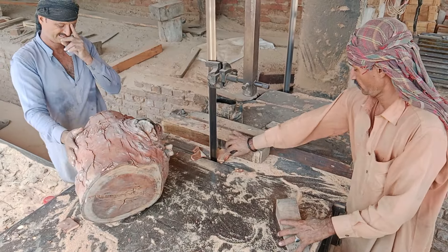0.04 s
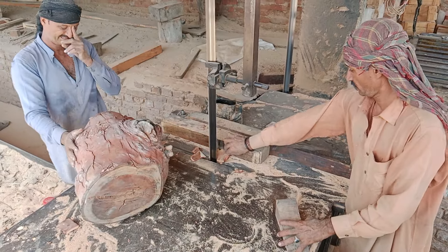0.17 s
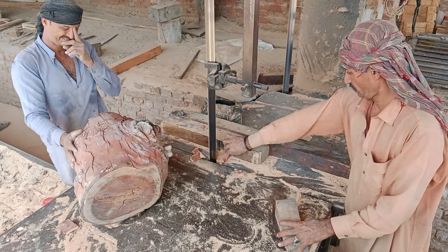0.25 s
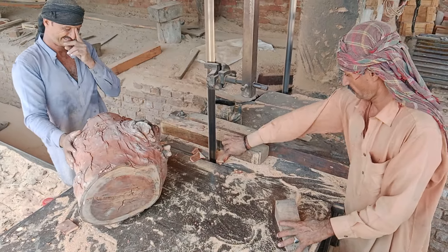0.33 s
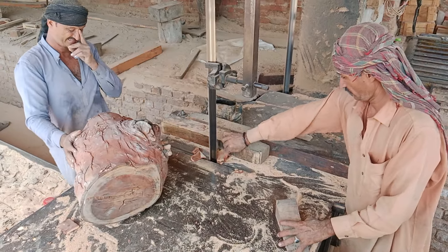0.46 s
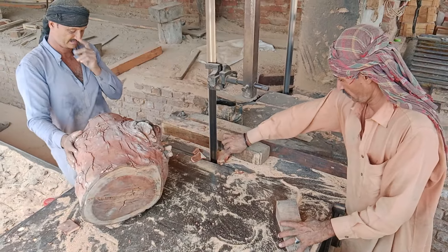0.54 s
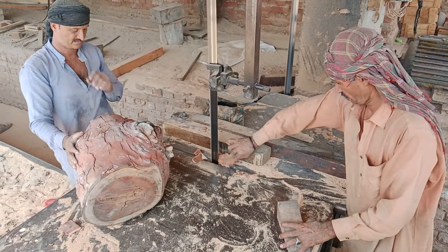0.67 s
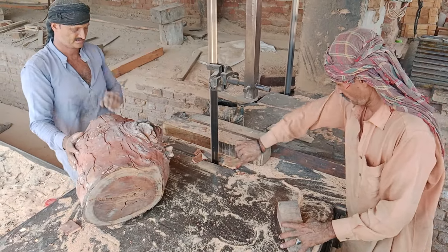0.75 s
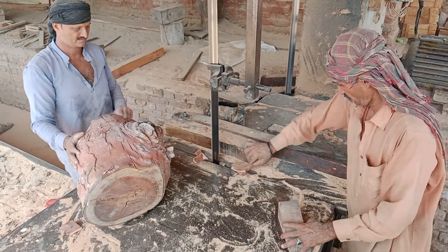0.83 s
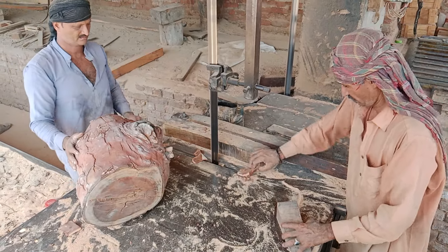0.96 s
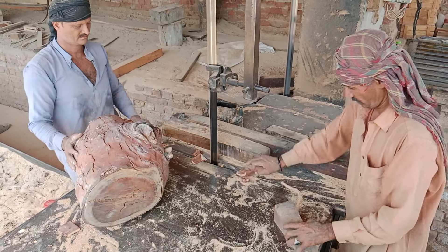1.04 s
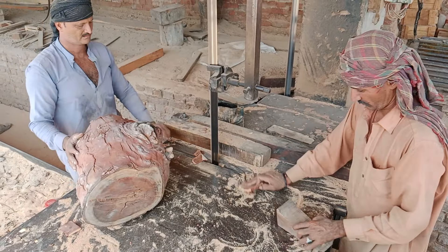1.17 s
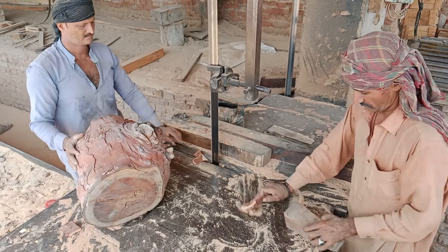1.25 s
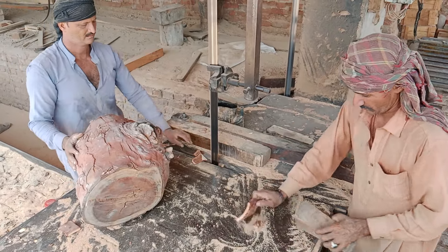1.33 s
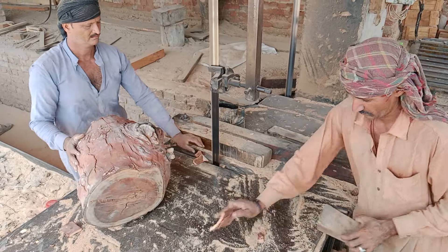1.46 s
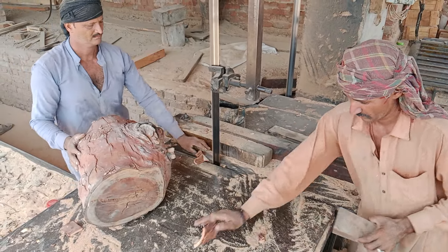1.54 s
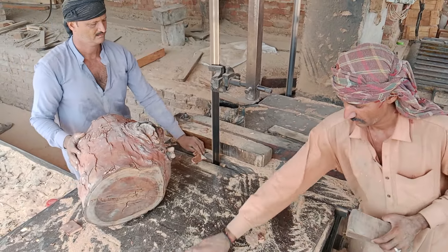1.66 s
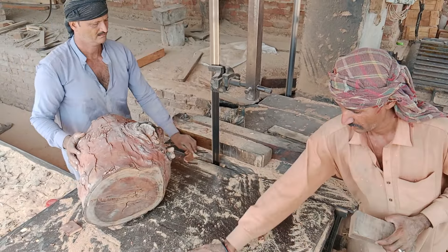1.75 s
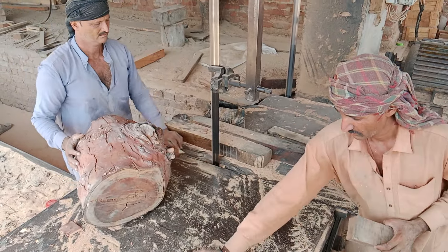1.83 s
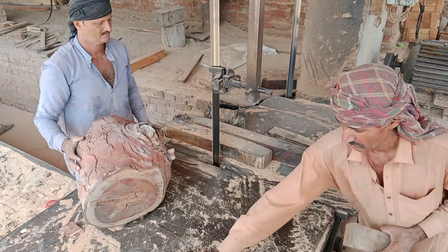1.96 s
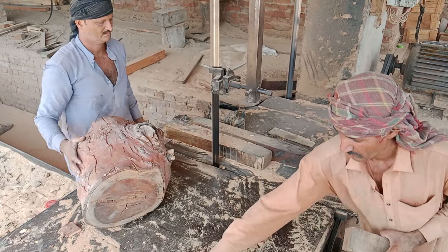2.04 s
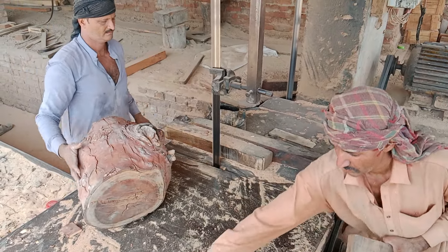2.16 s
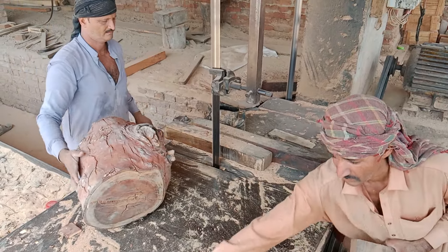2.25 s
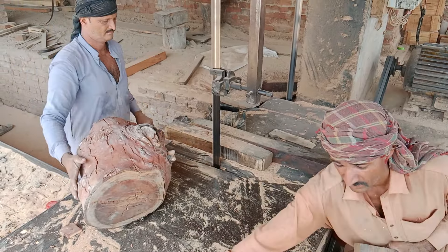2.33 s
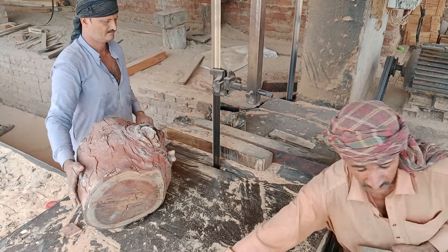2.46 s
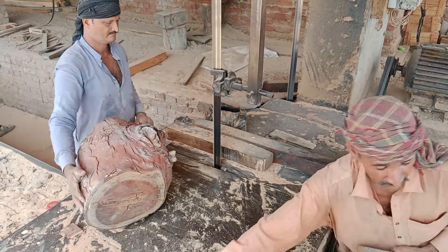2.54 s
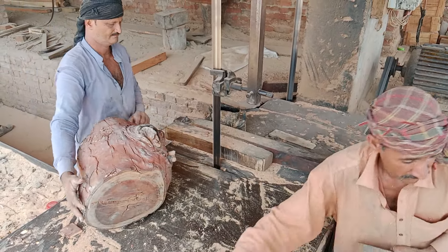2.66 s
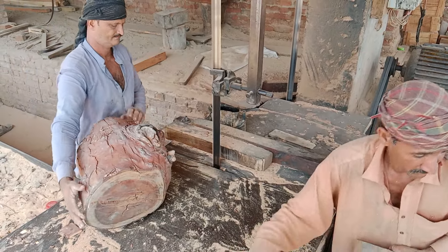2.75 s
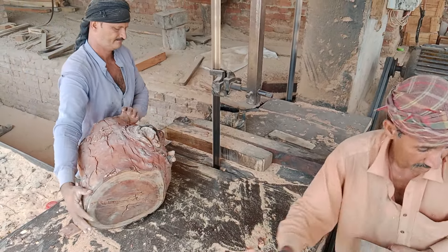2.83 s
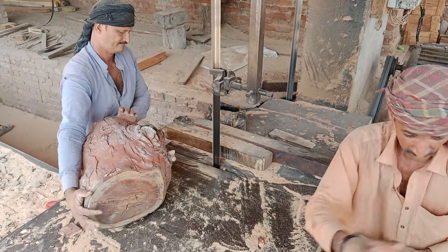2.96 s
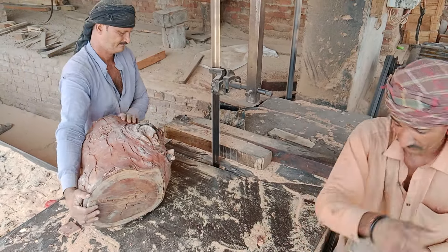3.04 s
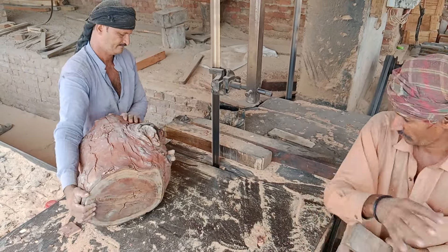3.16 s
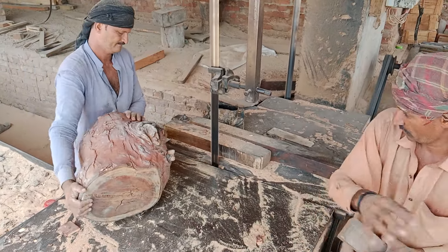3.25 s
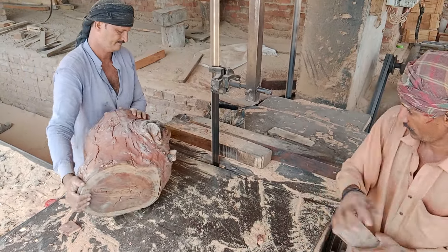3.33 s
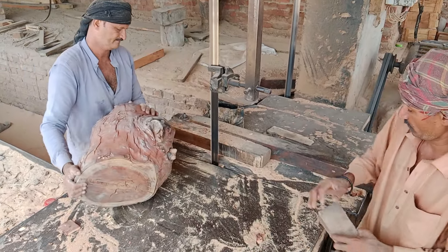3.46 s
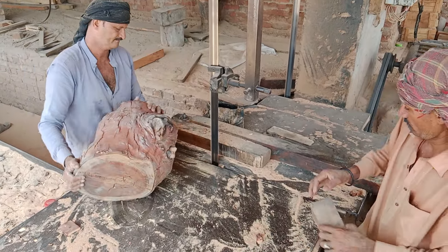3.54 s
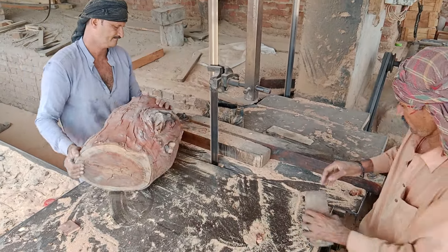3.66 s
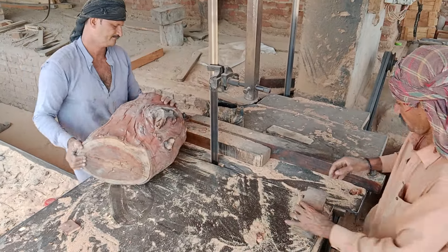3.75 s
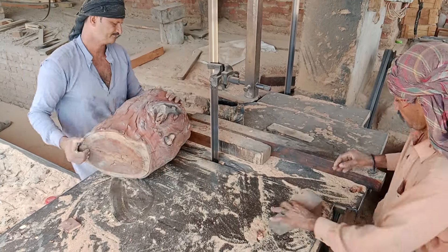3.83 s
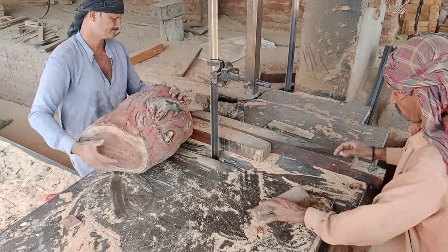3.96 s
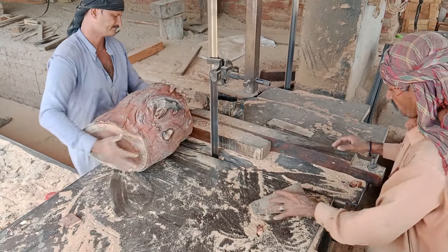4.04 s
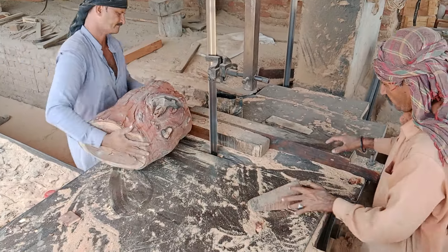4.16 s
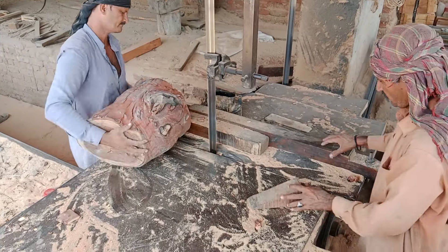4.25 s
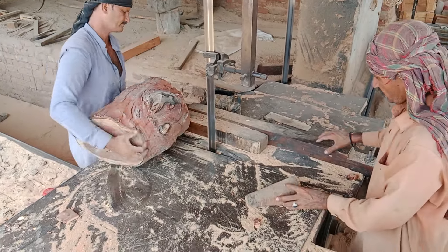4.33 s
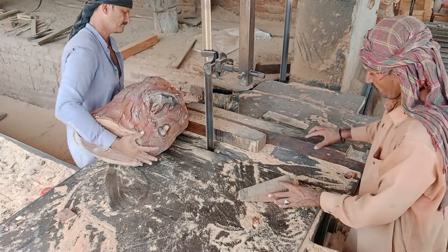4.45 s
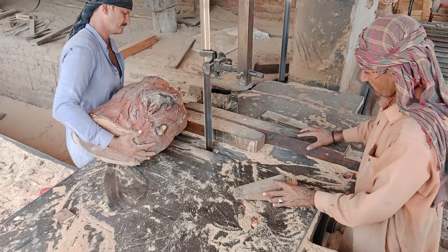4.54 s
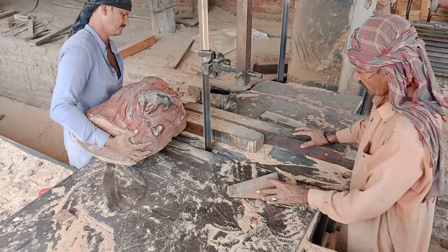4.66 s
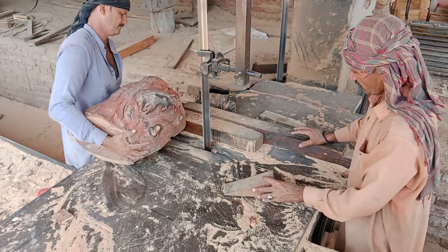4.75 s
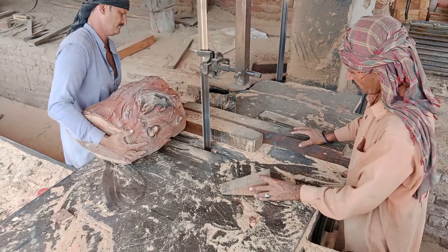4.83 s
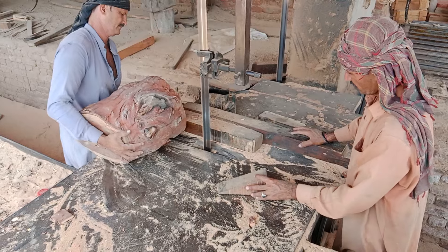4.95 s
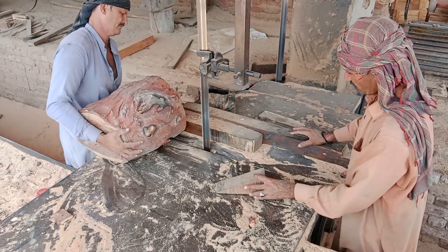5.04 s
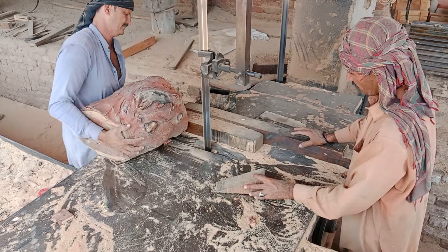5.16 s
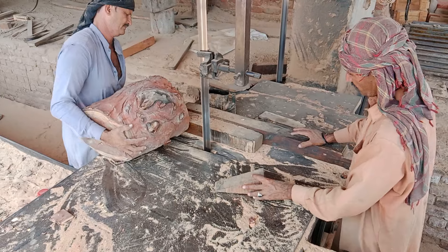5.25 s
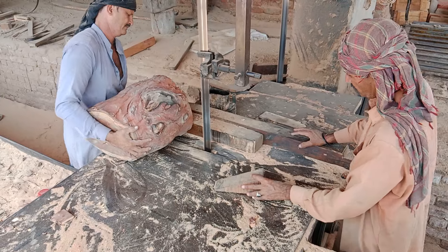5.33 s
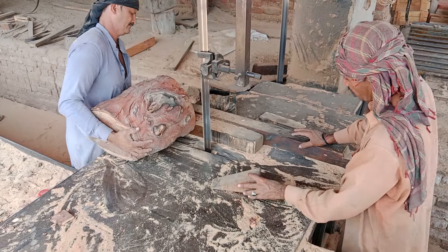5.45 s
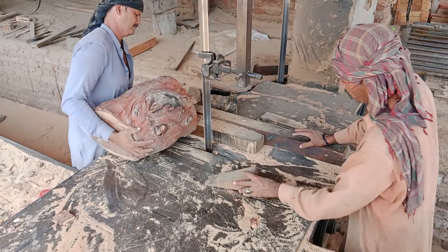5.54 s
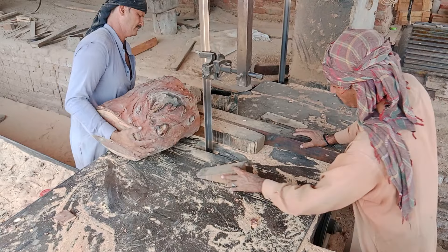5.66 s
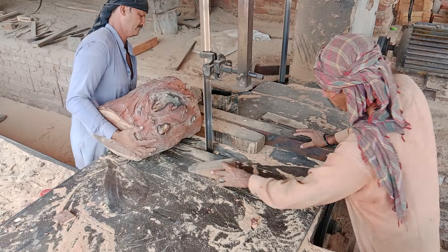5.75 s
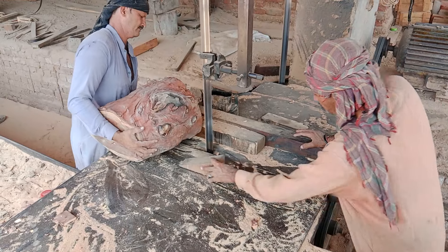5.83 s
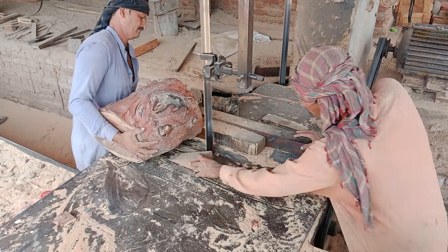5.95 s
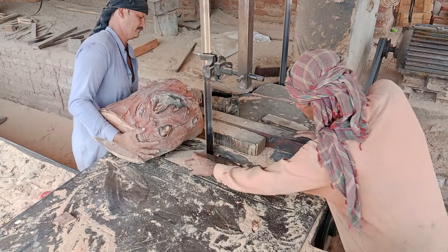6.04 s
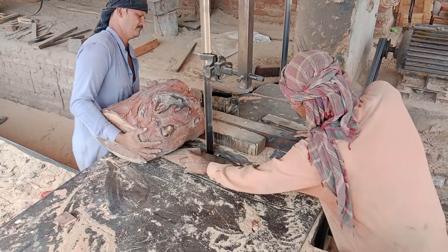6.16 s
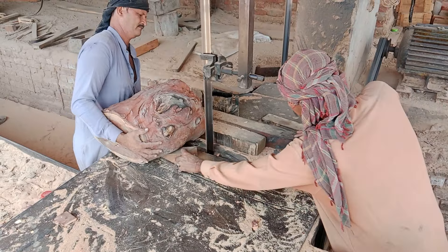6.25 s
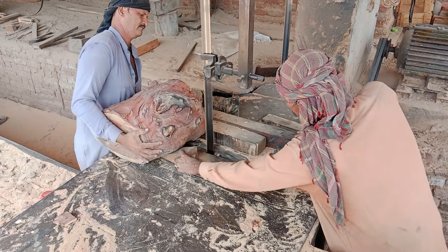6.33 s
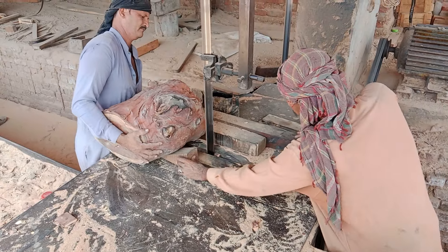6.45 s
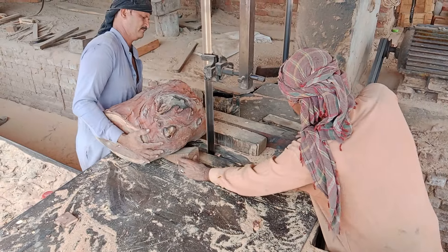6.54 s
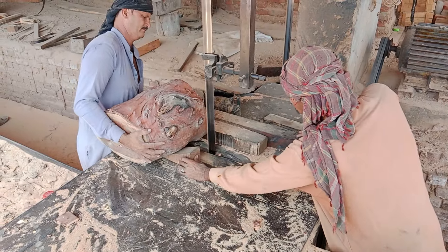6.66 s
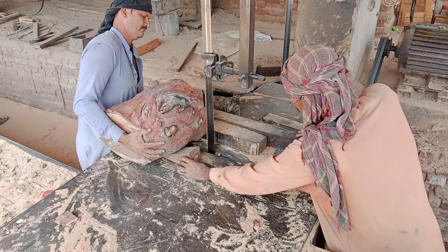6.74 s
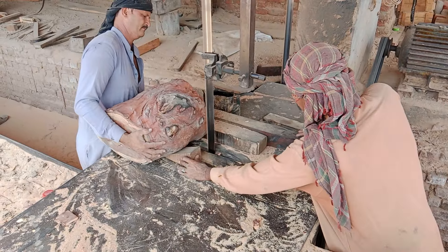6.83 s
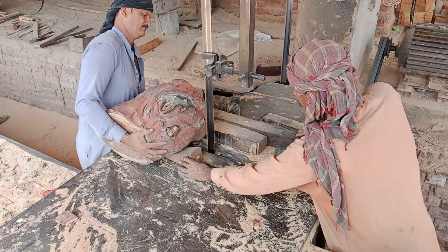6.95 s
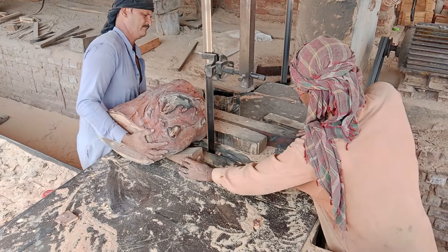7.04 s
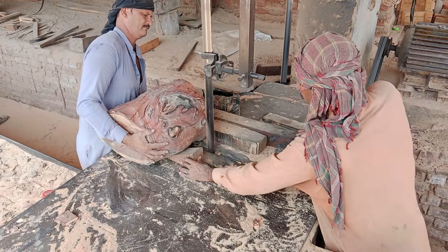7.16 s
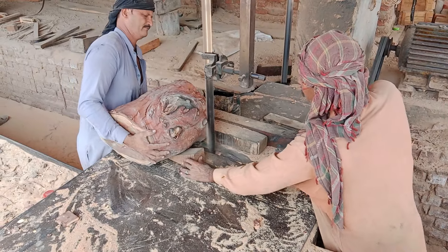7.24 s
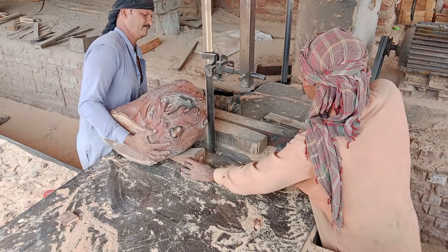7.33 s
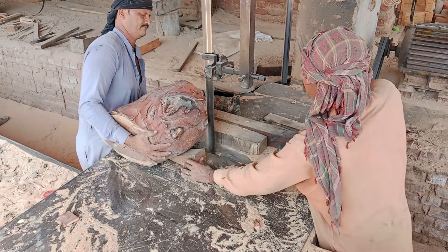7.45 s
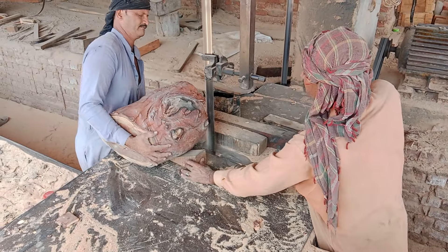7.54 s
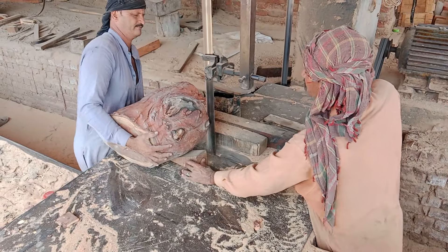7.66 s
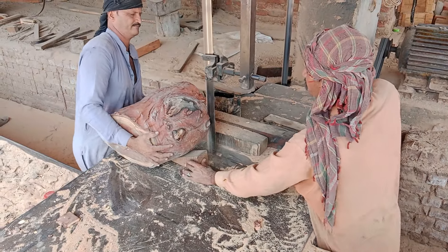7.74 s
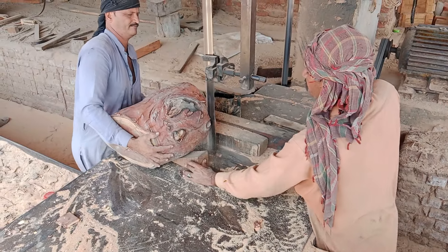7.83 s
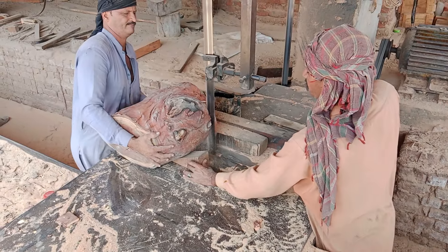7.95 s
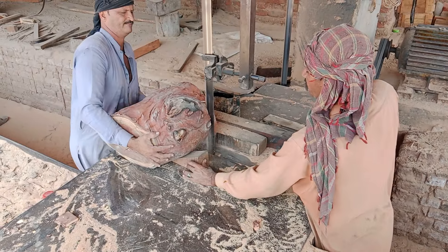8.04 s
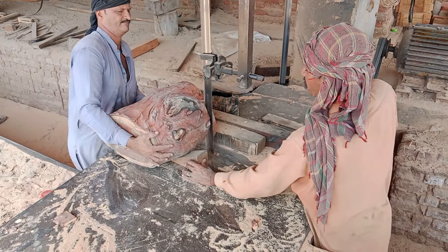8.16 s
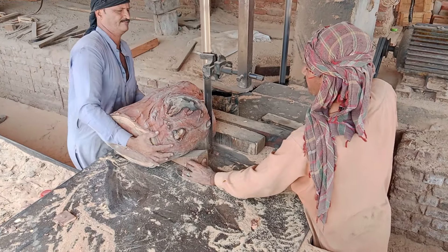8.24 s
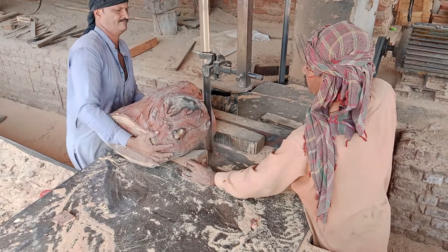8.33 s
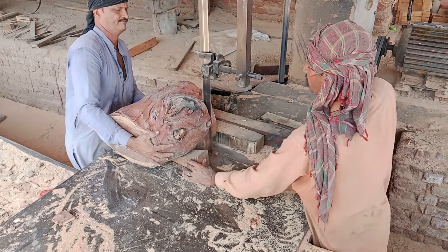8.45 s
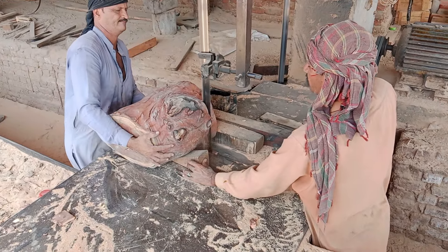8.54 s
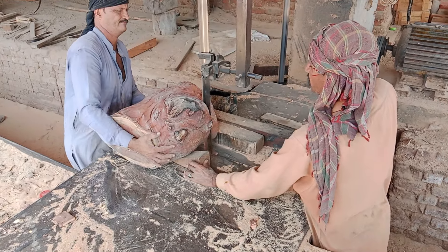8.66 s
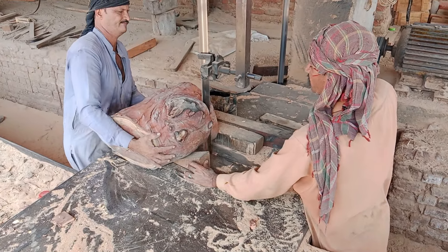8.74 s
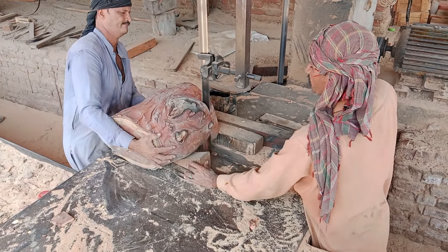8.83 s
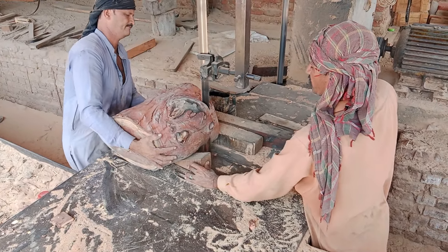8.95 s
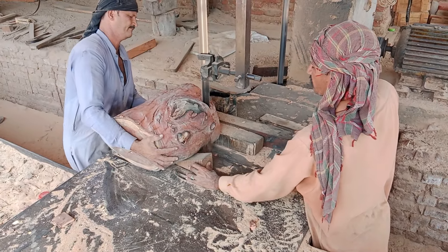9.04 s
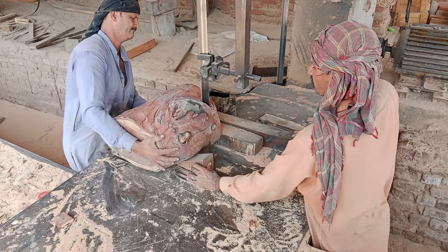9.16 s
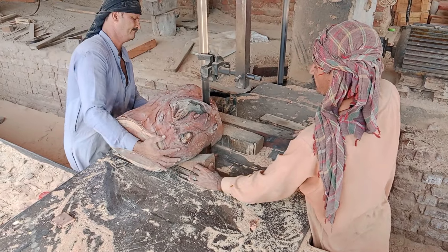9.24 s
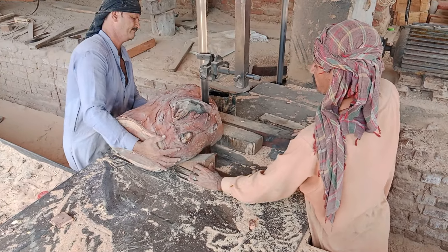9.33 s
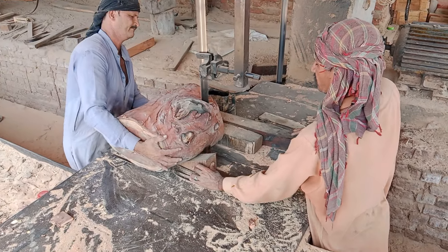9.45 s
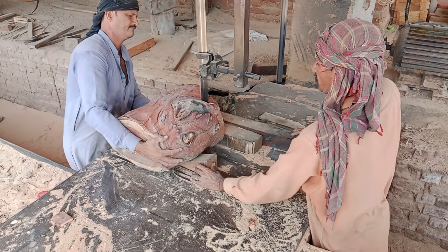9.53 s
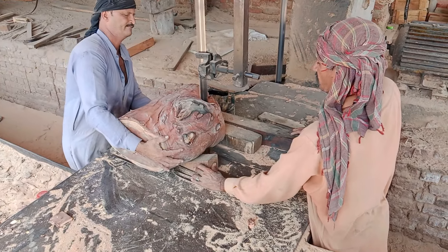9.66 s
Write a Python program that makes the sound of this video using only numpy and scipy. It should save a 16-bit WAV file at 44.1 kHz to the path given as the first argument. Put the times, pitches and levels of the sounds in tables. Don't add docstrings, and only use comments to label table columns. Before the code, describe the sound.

A band saw runs free with a steady hissing metallic whine, a log knocks on its table, then the cut bursts into a loud pulsing roar.

```python
import sys
import numpy as np
from scipy import signal
from scipy.fft import rfft, irfft
from scipy.io import wavfile

SR = 44100
rng = np.random.default_rng(int(sys.argv[2]) if len(sys.argv) > 2 else 0)


def gain_from_db(level_db):
    decades = np.asarray(level_db, float) / 20
    return 10 ** decades


def unload_wav(signal):
    wavfile.write(
        sys.argv[1],
        SR,
        np.round(np.clip(np.atleast_2d(signal).T, -1, 1) * 32767).astype(np.int16),
    )


N = 427329

# cut_on_hz, edge_hz, fade_hz, level_db
BENDING_WAVES = [(503, 15, 960, -21.5), (598, 52, 970, -16.5), (1460, 51, 1200, -60), (1780, 17, 350, -17),
                 (2536, 23, 66, -1.5), (2620, 69, 930, -11), (4660, 13, 90, -6), (4970, 100, 570, -7.5),
                 (6140, 25, 330, -13.5), (6760, 12, 110, 2.5), (6834, 73, 796, -2.5),
                 (12460, 120, 2100, -12), (13330, 200, 1500, -9)]
# centre_hz, width_hz, level_db
SPAN_MODES = [(895, 28, 8), (960, 50, -4), (1062, 28, 6), (1115, 30, -3), (1155, 35, 4), (1205, 70, -7),
              (1275, 110, -9), (1765, 30, 7), (1830, 40, -3), (1945, 35, 3), (2550, 30, 2), (2790, 70, 3),
              (2845, 25, -4), (2995, 35, 3), (3050, 500, 2.5), (3210, 40, 3), (3430, 160, -3),
              (3515, 40, 3), (3660, 30, -3), (3775, 60, 4), (3825, 30, -4), (3945, 60, 4), (4140, 50, 3),
              (4295, 50, 3), (5200, 70, 3), (5570, 50, 2), (6020, 60, -3), (8100, 200, 2), (8620, 80, 3),
              (9230, 120, 2)]
# pitch_hz, level_db (per Hz)
GUIDE_HISS = [(300, -39), (1200, -40), (1700, -22), (2400, -22.5), (3800, -19.5), (4500, -16),
              (6000, -10.5), (6600, -2.5), (8500, -10.5), (9400, -73), (10400, -18.5), (10900, -21),
              (11800, -19.5), (15700, -25)]


def band_colour():
    hz = bins_hz()
    power = gain_at(GUIDE_HISS) ** 2
    for on_hz, edge_hz, fade_hz, level_db in BENDING_WAVES:
        edge = 0.5 + 0.5 * np.tanh((hz - on_hz) / edge_hz)
        fade = np.exp(-np.maximum(hz - on_hz, 0) / fade_hz)
        power = power + gain_from_db(level_db) ** 2 * edge * fade
    return np.sqrt(power) * ripple(SPAN_MODES)


def band_song(song_db, top_db):
    colour, hz = band_colour(), bins_hz()
    low = 0.5 - 0.5 * np.tanh((hz - 1400) / 300)
    top = 0.5 + 0.5 * np.tanh((hz - 11500) / 500)
    middle = np.abs(1 - low - top)
    hum_share = np.sqrt(np.sum(colour ** 2 * low) / np.sum(colour ** 2))
    hum = hum_share * patchy(rng.standard_normal(N), colour * np.sqrt(low), 0.26, 1.5, 13.0, count=14)
    body = patchy(rng.standard_normal(N), colour * np.sqrt(middle), 0.18, 0.81, 21.0, count=14)
    hiss = patchy(rng.standard_normal(N), colour * np.sqrt(top), 0.6, 0.26, 25.0, count=3)
    flutter_hz = 10.3 + 2.5 * drift(1.5)
    flutter_db = 1.4 * np.cos(2 * np.pi * np.cumsum(flutter_hz) / SR)
    song = gain_from_db(song_db + 6.0 + 0.18 * flutter_db) * (hum + body)
    return song + gain_from_db(top_db - 29.5 + flutter_db) * hiss


# pitch_hz, level_db (per Hz)
ROAR_COLOUR = [(24, -57), (40, -12.5), (141, -1), (182, -2), (292, 0), (362, -1.5), (399, -2), (592, -1.5),
               (860, -3), (1550, -8.5), (4400, -18.5), (5720, -22), (9680, -120)]


def roar(roar_db, bright_db):
    ragged_db = np.interp(np.arange(N) / SR, [7.25, 7.4, 8.5, 8.8], [2.7, 0.58, 0.51, 2.3])
    grains = rng.standard_normal(N) * gain_from_db(2.0 * drift(140.0) + ragged_db * drift(88.0))
    low = 1 / (1 + (bins_hz() / 350) ** 2)
    rasp = 1 / (1 + (1800 / bins_hz()) ** 4)
    dull = rfft(patchy(grains, gain_at(ROAR_COLOUR), 0.7, 0.39, 25.0, count=8))
    bottom = irfft(dull * low, N)
    middle = gain_from_db(bright_db + 4) * irfft(dull * (1 - low) * (1 - rasp), N)
    top = gain_from_db(1.26 * (bright_db + 4.5)) * irfft(dull * (1 - low) * rasp, N)
    return gain_from_db(roar_db + 5) * (bottom + middle + top)


# start_s, teeth_per_s, strength
TOOTH_RATE = [(7.2, 623, .09), (7.65, 622, .11), (8.0, 620.2, .11), (8.45, 618.3, .12), (8.9, 616.4, .16),
              (9.25, 615, .17), (9.69, 612, .16)]
# pitch_hz, level_db (per Hz)
BITE_COLOUR = [(3000, -29), (4600, -13), (6300, -5.5), (6800, -4.5), (7400, 0.5), (8600, -10), (10500, -19),
               (12000, -16), (12600, -7.5), (14300, -5.5), (14900, -4.5), (15300, -10), (15900, -24)]


def teeth(bite_db):
    per_s, strength = in_time(TOOTH_RATE)
    passed = np.cumsum(per_s * (1 + 0.0015 * drift(20.0))) / SR
    blows = np.zeros(N)
    for k in range(8, 26):
        waver = gain_from_db(2.6 * drift(8.0))
        blows += waver * np.cos(2 * np.pi * k * passed + 0.9 * drift(18.0) + k * k)
    source = strength * blows + rng.standard_normal(N)
    whine = ripple([(6830, 290, 10.1)])
    return gain_from_db(bite_db + 8.5) * patchy(source, gain_at(BITE_COLOUR) * whine, 0.1, 0.63, 9.5, count=8)


# start_s, depth_db, sag_s, recovery_s
EASINGS = [(7.226, 5.5, 0.025, 0.012), (7.328, 15, 0.019, 0.012), (7.562, 11.5, 0.019, 0.01),
           (7.79, 1, 0.025, 0.019), (8.02, 1.5, 0.03, 0.017), (8.246, 5, 0.024, 0.018),
           (8.48, 3.5, 0.028, 0.018), (8.702, 12.5, 0.018, 0.015), (8.94, 4, 0.065, 0.025),
           (9.178, 10.5, 0.05, 0.016), (9.408, 8, 0.08, 0.041), (9.6, 13.5, 0.028, 0.039)]


def easing():
    t = np.arange(N) / SR
    eased_db = np.zeros(N)
    for s, depth_db, sag_s, recovery_s in EASINGS:
        eased_db += depth_db * np.exp(-((t - s) / np.where(t < s, sag_s, recovery_s)) ** 2)
    return eased_db


def surging(depth_db):
    surge_db, turns_per_s, surge_s, shallow_db = 3.8, 4.38, 8.11, -9.5
    turn = np.cos(2 * np.pi * turns_per_s * (np.arange(N) / SR - surge_s))
    return surge_db * turn * np.clip((depth_db - shallow_db) / 4.3, 0, 1)


# start_s, peak_db, pitch_hz, t60_s, thud_db (relative)
KNOCKS = [
    (3.889, -24.5, 895, .042, -11),
    (3.923, -25, 755, 0.035, -20),
    (3.934, -18.5, 955, .053, -10),
    (3.947, -29, 460, 0.041, 2),
    (5.434, -21.5, 680, 0.02, -40),
]


def knocks():
    overtone_db = -11
    modes = ((0.992, 0), (0.753, overtone_db), (1.296, overtone_db), (1.74, overtone_db - 2.5))  # ratio, dB
    out = np.zeros(N)
    for s, peak_db, hz, t60, thud_db in KNOCKS:
        click = np.zeros(N)
        click[round(s * SR)] = gain_from_db(peak_db - 25.5)
        for ratio, db in modes:
            swell = ring(click, ratio * hz, 0.012)
            out += gain_from_db(db) * ring(swell, ratio * hz, t60)
        out += gain_from_db(thud_db - 10) * ring(ring(click, 190, 0.042), 197, 0.075)
    return out


# pitch_hz, level_db (per Hz)
RUMBLE_COLOUR = [(18, -48), (30, -29), (91, -8), (166, -3.5), (236, -3.5), (276, -9.5), (324, -7.5),
                 (411, -18), (450, -16), (580, -35), (990, -120)]
# centre_hz, width_hz, level_db
FRAME_MODES = [(168.5, 20, 7.5), (230, 16, 8), (296, 26, 2.5)]
# start_s, level_db
SHAKE = [(0, -46), (1.0, -45.5), (1.5, -42.5), (2.6, -48), (3.6, -43.5), (4.7, -44), (5.3, -44),
         (6.3, -47.5), (7.15, -47.5)]
# start_s, depth_db, length_s
LULLS = [(.11, 11, .04), (0.733, 8, .04), (1.134, 10, 0.035), (1.74, 10, .03), (1.893, 10, 0.03),
         (2.067, 12, 0.049), (3.106, 14, 0.028), (3.5, 8, 0.042), (3.76, 12, 0.042), (4.266, 8, 0.054),
         (5.012, 15, 0.066), (5.584, 12, 0.023), (5.826, 2, 0.036), (6.113, 19, 0.025), (6.22, 5, 0.019),
         (6.503, 4, 0.11), (6.73, 10, .03), (7.074, 4, 0.036)]


def frame():
    wobble_depth_db, turns_per_s, wheel_high_s = -0.5, 4.08, 1.317
    t = np.arange(N) / SR
    colour = gain_at(RUMBLE_COLOUR) * ripple(FRAME_MODES)
    drumming = patchy(rng.standard_normal(N), colour, 1.0, 2.6, 8.0, count=8)
    wobble_db = wobble_depth_db * np.cos(2 * np.pi * turns_per_s * (t - wheel_high_s))
    lull_db = sum(depth_db * np.exp(-((t - s) / length_s) ** 2) for s, depth_db, length_s in LULLS)
    return gain_from_db(in_time(SHAKE)[0] + 1.5 + wobble_db - lull_db) * drumming


# start_s, centre_hz
SIDE_FLECKS = [(.131, 9650), (.131, 11800), (1.431, 6300), (1.431, 13100), (1.826, 8950), (3.451, 6900),
               (3.451, 14450), (3.544, 8950), (3.776, 13800), (4.334, 13100), (4.984, 4800), (4.984, 7600),
               (5.216, 4800), (5.216, 8300), (7.886, 8950), (8.049, 8600), (8.095, 8600), (8.351, 15100)]


def side_flecks(mono):
    size, width_hz, level_db = 2048, 1300, -5.5
    side = np.zeros(N)
    hz = np.arange(size // 2 + 1) * SR / size
    window = np.hanning(size) ** 0.7
    for s, centre_hz in SIDE_FLECKS:
        inside = np.abs(hz - centre_hz) < width_hz / 2
        at = round(s * SR) - size // 2
        level = np.std(irfft(rfft(mono[at:at + size]) * inside, size))
        noise = irfft(rfft(rng.standard_normal(size)) * inside, size)
        side[at:at + size] += gain_from_db(level_db) * level * rms_one(noise * window)
    return side


def rms_one(x):
    return x / np.sqrt(np.mean(x ** 2) + 1e-20)


def in_time(rows):
    s, *columns = np.transpose(rows)
    return [np.interp(np.arange(N) / SR, s, c) for c in columns]


def bins_hz():
    return np.arange(N // 2 + 1) * SR / N + 1e-3


def gain_at(points):
    hz, db = np.transpose(points)
    wide_hz = [hz[0] / 2, *hz, hz[-1] * 2]
    wide_db = [db[0] - 30, *db, db[-1] - 30]
    return gain_from_db(np.interp(np.log(bins_hz()), np.log(wide_hz), wide_db))


def ripple(modes):
    return gain_from_db(sum(db / (1 + (2 * (bins_hz() - hz) / width_hz) ** 2) for hz, width_hz, db in modes))


def drift(rate):
    r = np.exp(-80 * np.pi * rate / SR)
    slow = signal.lfilter([1], [1, -2 * r, r * r], rng.standard_normal(N // 40 + 2002))[2000:]
    return np.interp(np.arange(N) / 40, np.arange(len(slow)), rms_one(slow))


def patchy(source, gain, shared_db, own_db, own_rate, count):
    spectrum, place = rfft(source) * gain, np.log(bins_hz())
    live = place[gain > gain.max() / 300]
    centres = np.linspace(live[0], live[-1], count)
    together = drift(own_rate)
    out = np.zeros(N)
    for k in range(count):
        share = np.interp(place, centres, np.arange(count) == k)
        flicker_db = shared_db * together + own_db * drift(own_rate)
        out += irfft(spectrum * np.sqrt(share), N) * gain_from_db(flicker_db)
    return rms_one(out)


def ring(clicks, hz, t60):
    r, w = gain_from_db(-60 / (t60 * SR)), 2 * np.pi * hz / SR
    return signal.lfilter([0, np.sin(w)], [1, -2 * r * np.cos(w), r * r], clicks + 1e-18)


# start_s, pressure_db
RUNNING = [(0, 0.1), (.6, -0.5), (.95, 0.04), (2.5, -0.23), (4.3, .5), (5.2, -.3), (6.3, -0.6),
           (6.65, -0.1), (7.15, -.3)]
# start_s, force_db (feed), depth_db (teeth in sound wood)
CUT = [
    (7.2, -7, -11),
    (7.29, -0.5, -7.5),
    (7.75, 0, -2.5),
    (8.15, -0.5, -1.5),
    (8.55, 0.5, -5.5),
    (8.75, 0.5, -12),
    (9.1, 0, -10.5),
    (9.5, -0.5, -10.5),
    (9.69, 0, -15.5),
]


def scene():
    t = np.arange(N) / SR
    pressure_db, = in_time(RUNNING)
    force_db, depth_db = in_time(CUT)
    eased_db, surge_db = easing(), surging(depth_db)
    engaged = np.clip((t - 7.15) / 0.09, 0, 1)
    buried = np.clip((t - 7.19) / 0.008, 0, 1)
    song = band_song(-25.5 + pressure_db, 2.5 * pressure_db) * gain_from_db(-1.5 * engaged)
    roar_db = -15 + force_db - 0.72 * surge_db - 0.99 * eased_db
    bright_db = depth_db + surge_db - 0.22 * eased_db
    bite_db = -20.5 + 0.095 * force_db + 0.3 * depth_db - 0.34 * eased_db
    mono = song + buried * roar(roar_db, bright_db) + engaged * teeth(bite_db) + knocks() + frame()
    return np.array([mono, mono])


def band_limit(x):
    return signal.sosfilt(signal.butter(12, 16360, fs=SR, output="sos"), x)


def record(dry):
    overload, knee, cutoff_hz = 0.43, 21.0, 15740
    flat = dry / (1 + np.abs(dry / overload) ** knee) ** (1 / knee)
    passed = (bins_hz() < cutoff_hz) / np.sqrt(1 + (60 / bins_hz()) ** 4)
    wide = irfft(rfft(flat) * passed, N) + side_flecks(flat[0]) * [[1], [-1]]
    return band_limit(wide)


dry = scene()
out = record(dry)
unload_wav(out)
```